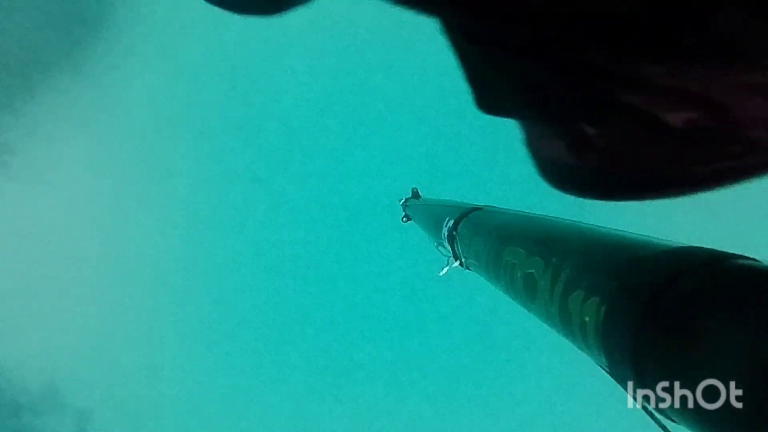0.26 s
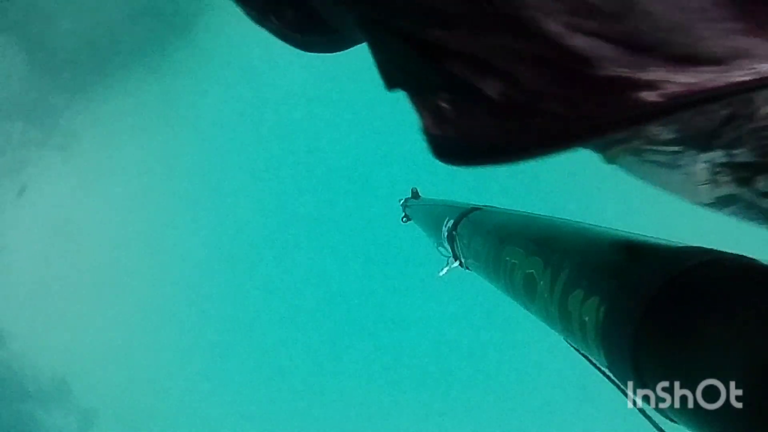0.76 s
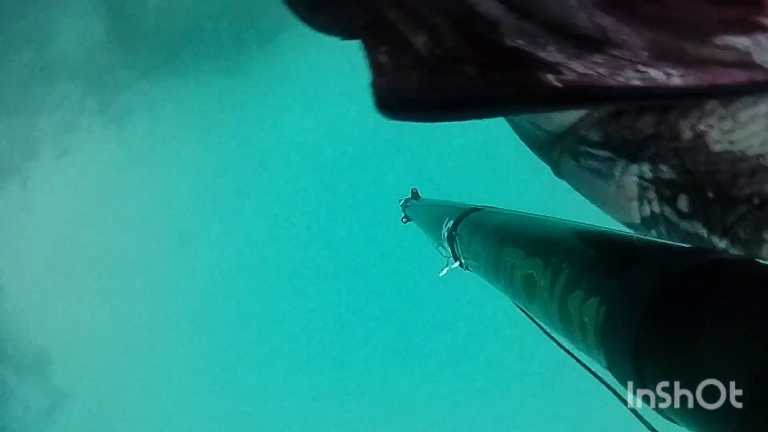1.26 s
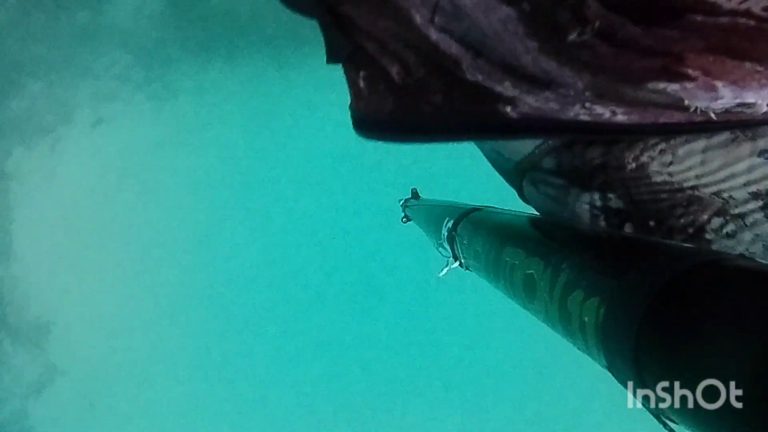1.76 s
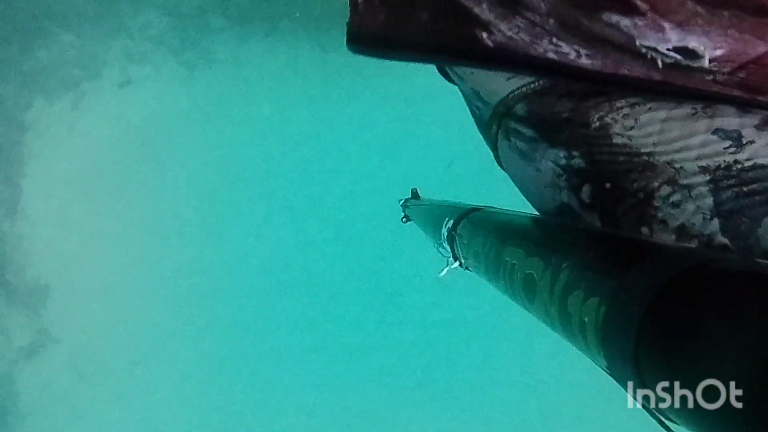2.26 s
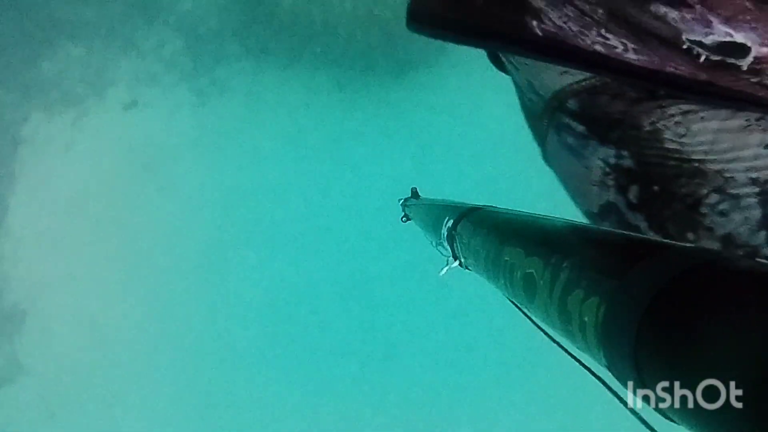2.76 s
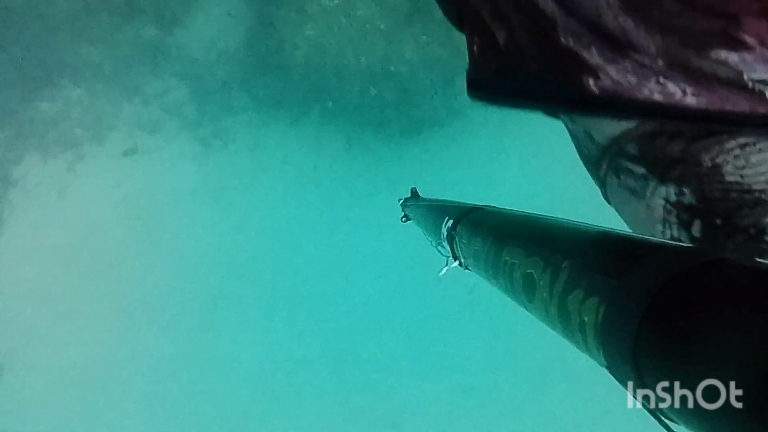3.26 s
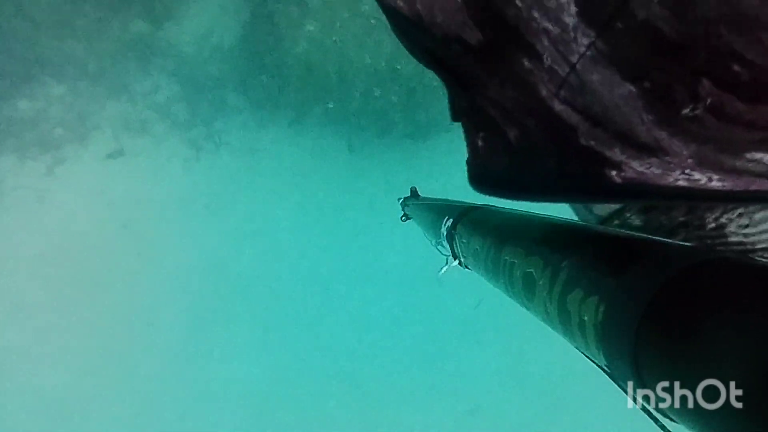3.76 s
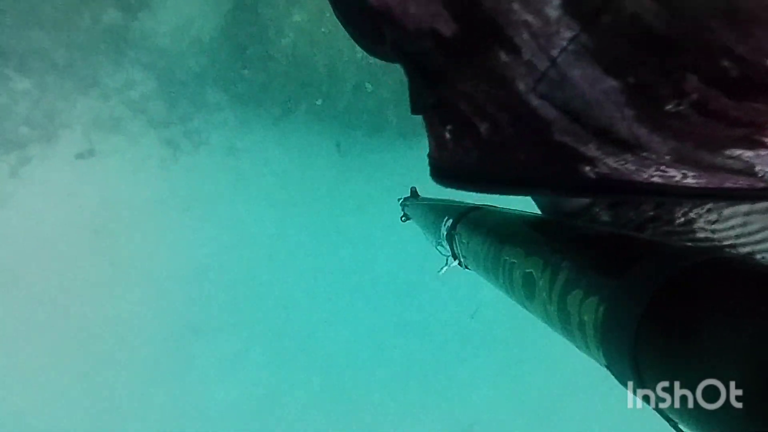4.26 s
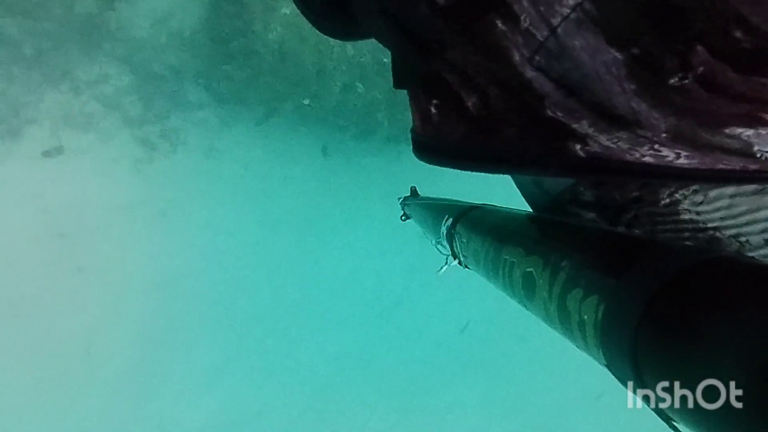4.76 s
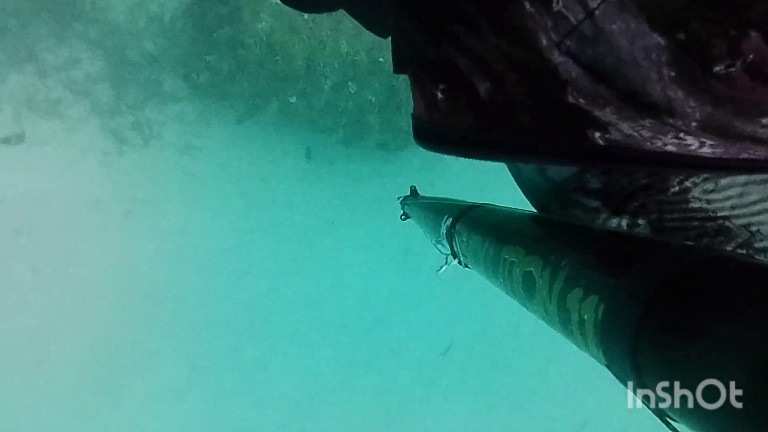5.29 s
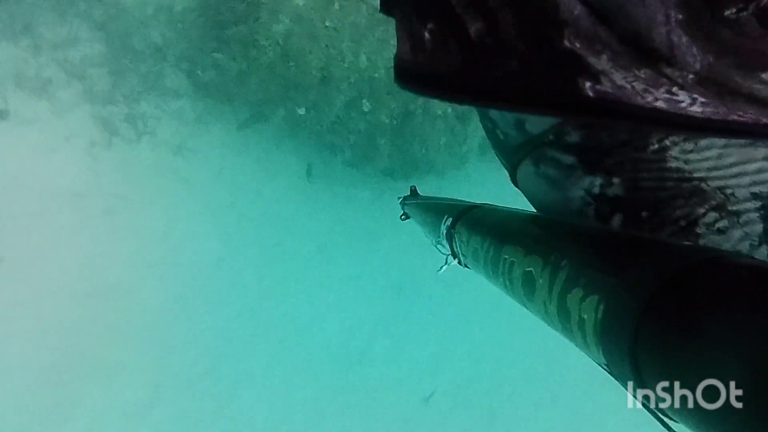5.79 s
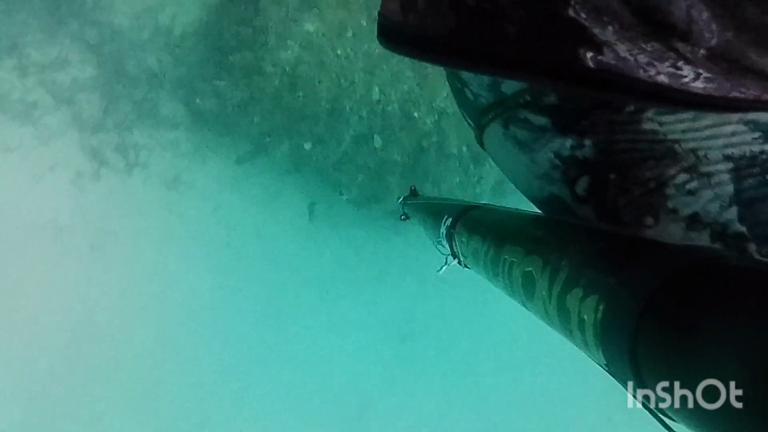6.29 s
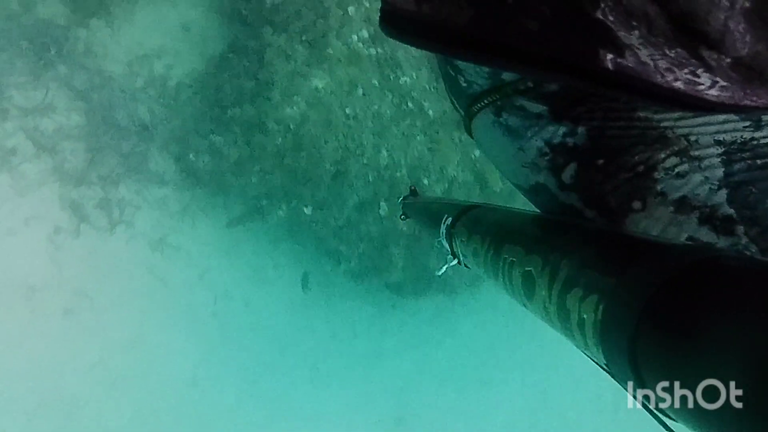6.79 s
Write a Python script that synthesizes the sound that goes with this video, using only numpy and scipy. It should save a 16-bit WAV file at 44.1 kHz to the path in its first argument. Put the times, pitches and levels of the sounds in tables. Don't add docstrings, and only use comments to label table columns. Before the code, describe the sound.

Loose gear knocks and ticks on a sealed underwater housing above low rumble and faint hiss, with violent blows near the start and end.

```python
import sys
import numpy as np
from scipy import signal
from scipy.fft import rfft, irfft
from scipy.io import wavfile
from scipy.ndimage import uniform_filter1d

SR = 44100
rng = np.random.default_rng(int(sys.argv[2]) if len(sys.argv) > 2 else 0)


def transcribe(signal):
    frames = np.atleast_2d(signal).T
    limited = np.clip(frames, -1, 1)
    pcm = np.round(limited * 32767).astype(np.int16)
    wavfile.write(sys.argv[1], SR, pcm)


def gain_from_db(level_db):
    decades = np.asarray(level_db, float) / 20
    return 10 ** decades


N = 310023

# (start_s, ring_db, crack_db, crack_tilt_db per octave, shove_db)
SLAMS = [
    (0.2803, -4.5, -52, -7.5, -42),
    (0.3014, 2, -24, -6, -14.5),
    (0.319, -69, -58, 8, -53),
    (6.9675, -5.5, -18, 3.5, -2.5),
]
# (pitch_hz, level_db, t60_s)
SNAP_RINGS = [
    [(2450, -5, .003), (3600, -7, .003), (4500, -3, 0.003), (5250, 2.5, 0.0045), (6200, -14, 0.004)],
    [(7313, -6.5, 0.0043), (8668, -1, 0.0022), (10500, -10, 0.00322), (14000, -12, .005)],
]


def evened(x):
    return x / np.sqrt(np.mean(x ** 2) + 1e-20)


def read(points, hz):
    f, value = np.transpose(points)
    return np.interp(np.log(hz + 1), np.log(f + 1), value)


def bumps(peaks, hz):
    return sum(db / (1 + (2 * (hz - f) / width) ** 2) for f, width, db in peaks)


def fade_db(ratio):
    return 10 * np.log10(1 + ratio ** 6)


def add(mix, s, sound):
    part = mix[round(s * SR):][:len(sound)]
    part += sound[:len(part)]


def ring(modes, spread, blow_s, size, turns=0, vary_db=3.5):
    t = np.arange(size) / SR
    hz, db, t60 = np.transpose(modes)[:, :, None]
    pitch_chance, level_chance = rng.standard_normal((2, len(modes), 1))
    rise = 1 - np.exp(-(t / (blow_s + turns / hz)) ** 2)
    decay = gain_from_db(db + vary_db * level_chance - 60 * t / t60)
    sines = np.sin(2 * np.pi * hz * (1 + spread * pitch_chance) * t)
    x = (decay * rise * sines).sum(0)
    return x / abs(x).max()


def struck(rows, groups, blow_s, size, turns, spread, vary_db):
    out = np.zeros(N)
    for s, db, *others_db in rows:
        for modes, rel_db in zip(groups, [0, *others_db]):
            add(out, s, gain_from_db(db + rel_db) * ring(modes, spread, blow_s, size, turns, vary_db))
    return out


def blows(rows, low_db, mid_db, up_db, thud_db):
    return [(s, db, low_db + deep, mid_db + hard[0], up_db + hard[-1], thud_db + deep)
            for s, db, deep, *hard in rows]


def noise(field_db, patchy_db, flicker_db, size, count=N, order=5):
    frames = 4 * count // size + 8
    hz = np.fft.rfftfreq(size, 1 / SR)[:, None]
    a, b, patches = rng.standard_normal((frames, len(hz), 3)).T
    patches = uniform_filter1d(patches, size=order, axis=0)
    patches = evened(uniform_filter1d(patches, size=5, axis=1))
    flicker = flicker_db * rng.standard_normal(frames)
    z = (a + 1j * b) * gain_from_db(field_db(hz) + patchy_db(hz) * patches + flicker)
    return evened(signal.istft(z, nperseg=size, noverlap=3 * size // 4)[1][:count])


def since_big_blows():
    t = np.arange(N) / SR
    return [t - SLAMS[1][0], t - SLAMS[3][0]]


def rumble_and_wash(flow_db):
    # (pitch_hz, level_db per Hz)
    colour = [(8, -14), (19, 0), (28, -9), (40, -11), (62, -8), (85, -22), (130, -17), (176, -15),
              (230, -22), (262, -30), (460, -27), (650, -32), (900, -43), (1300, -80)]
    rumble = noise(lambda hz: read(colour, hz) - fade_db(hz / 110), lambda hz: 1.5, .6, size=4096)
    wash = noise(lambda hz: read(colour, hz) - fade_db(110 / (hz + 1)), lambda hz: 1.8, 1.0, size=1024)
    surge_db, surge_t60 = -30, .3
    surge = sum(gain_from_db(surge_db - 60 * abs(u) / surge_t60) * (u > 0) for u in since_big_blows())
    drag = uniform_filter1d(1. * (np.arange(N) / SR < SLAMS[1][0]), size=3000)
    wash_db = -66.5 + 0.76 * flow_db + 11.5 * drag
    return (gain_from_db(-55 + flow_db) + surge) * rumble + gain_from_db(wash_db) * wash


def hiss(flow_db):
    # (pitch_hz, level_db per Hz)
    colour = [(410, -35), (700, -18.5), (1140, -7.5), (1450, 4), (1650, 1.5), (1910, -4), (2770, -12.5),
              (3200, -11.5), (4580, -15), (5150, -8), (9720, -17.5), (10500, -18), (11900, -27),
              (14500, -26), (16500, -38.5)]
    # (pitch_hz, width_hz, level_db)
    peaks = [(2715, 170, 12), (5070, 170, 6.5), (6830, 450, 6), (10800, 600, 3.5)]

    def field_db(hz):
        return read(colour, hz) + bumps(peaks, hz)

    low = noise(lambda hz: field_db(hz) - fade_db(hz / 3500), lambda hz: 1.2, .8, size=1024)
    top = noise(lambda hz: field_db(hz) - fade_db(3500 / (hz + 1)) - 25 * (hz > 15500),
                lambda hz: 6.5 * hz / 12000, .6, size=2048, order=2)
    duck_after_s, duck_hold_s = 0.032, 0.293
    duck = sum(1. * (u > duck_after_s) * (u < duck_after_s + duck_hold_s) for u in since_big_blows())
    duck = uniform_filter1d(duck, size=800)
    return gain_from_db(-70.5 + 0.068 * flow_db) * (low + gain_from_db(-5 - 5 * duck) * top)


def water():
    # (start_s, level_db)
    flow = [(0, -2.5), (.13, 9.5), (.25, 10), (.45, -4.5), (.62, 1.5), (1.02, -2), (1.23, 3), (1.62, 5),
            (1.8, -1), (2.21, 6), (2.5, 2.5), (2.99, -1), (3.21, 0), (4.31, 0), (5.66, -4.5), (6.32, 1),
            (6.6, -0.5), (7.03, -0.5)]
    flow_db = np.interp(np.arange(N) / SR, *np.transpose(flow))
    return rumble_and_wash(flow_db) + hiss(flow_db)


def scrape():
    # (pitch_hz, level_db per Hz)
    colour = [(59, -35), (100, -4.5), (298, -12), (367, -8.5), (426, -2.5), (670, 1), (1070, -8.5),
              (1620, -1.5), (1960, -5), (2650, -24.5), (2910, -26.5), (3650, -23.5), (4480, -19.5),
              (6790, -37.5), (9000, -55), (11700, -69), (19800, -120)]
    # (pitch_hz, width_hz, level_db)
    peaks = [(619.7, 150, 3), (1770, 240, 4), (3400, 200, 2.5), (4650, 800, 8), (2450, 500, 6.5),
             (3050, 200, -10), (3750, 250, -9), (7300, 300, 4.5)]
    # (start_s, level_db)
    strength = [(0, -42.5), (.04, -44.5), (.085, -45.5), (.095, -45.5), (.13, -49), (.17, -44), (.2, -49.5),
                (.215, -60), (.277, -56.5)]
    out, t = np.zeros(N), np.arange(0, strength[-1][0], 1 / SR)
    grit = noise(lambda hz: read(colour, hz) + bumps(peaks, hz), lambda hz: 3.5, 2.5,
                 size=512, count=len(t))
    add(out, 0, gain_from_db(np.interp(t, *np.transpose(strength))) * grit)
    return out


def thinned(x):
    # (pitch_hz, level_db)
    gap_below = [(2400, -14), (3400, -5.5), (5200, -6.5), (8000, -3.5), (11000, -2), (14000, -0.5)]
    hz, _, z = signal.stft(x, SR, nperseg=2048, noverlap=1536)

    def mean_power(z, size):
        over_pitch = uniform_filter1d(abs(z) ** 2, size, axis=0)
        return abs(uniform_filter1d(over_pitch, size=3, axis=1)) + 1e-24

    beside_db = 10 * np.log10(mean_power(z, size=3) / mean_power(z, size=41))
    under_db = read(gap_below, hz)[:, None] - beside_db
    is_treble = hz[:, None] > gap_below[0][0]
    kept = z * gain_from_db(-16 * np.clip(under_db / 2, 0, 1) * is_treble)
    kept = kept * np.sqrt(mean_power(z, size=41) / mean_power(kept, size=41))
    return signal.istft(kept, SR, nperseg=2048, noverlap=1536)[1][:N]


def crackle():
    snaps_per_s, level_db = 40, -72.5
    happens = rng.random(N) < snaps_per_s / SR
    sizes = gain_from_db(4.6 * np.minimum(rng.exponential(1, N), 2)) * happens
    middle = ring(SNAP_RINGS[0], 0.012, .0001, size=500)
    top = ring(SNAP_RINGS[1], .02, .0001, size=500)
    return gain_from_db(level_db) * signal.oaconvolve(sizes, middle + 0.34 * top)[:N]


def shrimp_snaps():
    # (start_s, level_db of the middle, top_db against it)
    snaps = [(.181, -43, -22), (1.2366, -56.5, 2), (1.3985, -63, -27), (1.8701, -48.5, -4),
             (1.918, -53, -1), (2.0622, -57, -6), (2.6647, -56.5, 3.5), (2.8154, -54, -13.5),
             (3.2428, -58, -1), (3.2826, -46, -5), (3.6454, -55, -15), (3.6992, -56, -20.5),
             (4.062, -60, -11), (4.2153, -60.5, 5), (4.3914, -55.5, 2), (4.4116, -55, -19),
             (4.5114, -47, 0), (4.6339, -57, -16), (4.7721, -55, -24), (4.9866, -54.5, -25),
             (5.3175, -57, -22), (5.329, -58, -22), (5.415, -60, -22), (5.3544, -59, -15),
             (5.683, -58, -17), (5.7878, -58, -20), (5.881, -55, -2), (5.9803, -51, -24.5),
             (6.323, -46.5, -22), (6.356, -40.5, -18), (6.3667, -54, -21), (6.4364, -55, 2)]
    return struck(snaps, SNAP_RINGS, 0.00026, 500, turns=0, spread=.03, vary_db=3)


def thumps():
    # (start_s, level_db, pitch_hz, t60_s)
    bumps_in_water = [
        (6.533, -44, 135, .08),
        (6.536, -50, 190, .05),
        (.225, -36, 200, .05),
        (2.21, -48, 145, .08),
        (3.02, -44, 228, .09),
        (1.40, -48, 215, .09),
        (.305, -29, 20, 2.0),
        (6.970, -12, 12, .058),
    ]
    out = np.zeros(N)
    for s, db, hz, t60 in bumps_in_water:
        add(out, s, gain_from_db(db) * ring([(hz, 0, t60)], 0, 0.0022, size=round(t60 * SR)))
    return out


def slips():
    # (first_s, last_s, slip_rate_hz, low_ring_db, high_ring_db against the low)
    trains = [(0.5144, 0.605, 43, -55.5, -14.5), (1.019, 1.167, 35, -58, -8), (1.6778, 1.722, 42, -57, -10),
              (1.7574, 1.8345, 50, -53.5, -8), (1.9275, 1.9565, 35, -57, -9), (2.167, 2.231, 45, -54, -14),
              (5.994, 6.0217, 39, -59, -10), (6.07, 6.2178, 40, -59, -10), (6.254, 6.333, 41, -53.5, -15),
              (6.379, 6.503, 40, -55, -8), (6.5896, 6.701, 26, -58, -12), (6.8925, 6.9306, 51, -44, -9)]
    # (start_s, low_ring_db, high_ring_db against the low)
    catches = [(0.383, -51, -29), (.5636, -52.5, -6.5), (1.705, -49, -7), (1.816, -49, -17),
               (2.272, -59, -8.5), (2.3423, -57, -9), (2.745, -58.5, -35), (6.3555, -54, -30),
               (5.8, -55, -8), (6.0912, -53, -14), (6.119, -47, -9), (6.1942, -47.5, -8),
               (6.2799, -52.5, -8), (6.4324, -50.5, -7), (6.755, -50, -7.5), (6.785, -56.5, -7),
               (6.8733, -52, -9), (6.953, -54, -25)]
    jitter_s, spread_db = .001, 1.5
    rows = []
    for first, last, hz, db, high_db in trains:
        times = np.linspace(first, last, round((last - first) * hz) + 1)
        chance = rng.standard_normal((len(times), 2))
        for s, (late, loud) in zip(times, chance):
            rows.append((s + jitter_s * late, db + spread_db * loud, high_db))
    return rows + catches


def line_ticks():
    # (pitch_hz, level_db, t60_s)
    tones = [
        [(1632, 13, 0.023), (1700, -10.5, 0.0123), (2170, -5, 0.034)],
        [(4510, 0, 0.011), (4750, -3, 0.008), (5200, 0, 0.003)],
    ]
    return struck(slips(), tones, 0.0014, 1200, turns=0, spread=.008, vary_db=2)


def tube_raps():
    # (start_s, main_ring_db, depth_db, middle_hardness_db, upper_hardness_db)
    raps = [
        (0.352, -38.5, -5, -1, -3),
        (0.429, -38.5, 1.5, 0, 2.5),
        (0.683, -21.5, -1, -2.5, 5.5),
        (0.6945, -40, 0, 2, 6),
        (0.908, -49, 10, 17, 12),
        (1.729, -44, 1, 0, 3),
        (1.843, -54.5, 14, 13, 11),
        (2.71, -40.5, 1, -4, -13),
        (3.172, -44.5, 8, 6.5, -11),
    ]
    # (pitch_hz, level_db, t60_s)
    tube = [
        [(620, 9.5, 0.025), (650, -3.5, 0.041)],
        [(464, 3, 0.035), (394.4, -2, 0.049)],
        [(830, 1.5, 0.027), (858, -1, 0.014), (1084, 0, 0.018), (1218, 1, 0.03)],
        [(1504, 1, 0.0206), (1600, 5.5, 0.014), (1960, -6, 0.02), (2326, -18, 0.02), (2650, -24.5, .024),
         (3170, -30.5, 0.024)],
        [(227, -12.5, 0.088), (296, -9.5, 0.038)],
    ]
    rows = blows(raps, low_db=-4, mid_db=-3.5, up_db=-6.5, thud_db=-7.5)
    return struck(rows, tube, 0.00042, 3000, turns=.4, spread=.012, vary_db=2)


def housing_knocks():
    # (start_s, main_ring_db, depth_db, hardness_db, or middle and upper hardness_db apart)
    knocks = [(0.528, -54.5, -4, -4.5), (0.826, -58.5, 5.5, -5), (0.936, -53, 1, -12), (1.359, -53, 4, -3),
              (1.371, -66, 23, 10), (1.4015, -44, 2, -14, -9), (1.406, -32.5, 1, -14, -7),
              (1.567, -42, -3, -7), (1.69, -58, 6, 5), (1.715, -56, 15.5, 16), (1.749, -36, 3, 4, 4),
              (1.905, -56, 4, -6), (1.99, -32.5, -4, 0, 0), (2.081, -50, -11, -4), (2.092, -33, -1, 3, 5),
              (2.177, -50.5, 8, 4), (2.199, -34.5, 0, 5, 5), (2.34, -48.5, -9, -3.5),
              (2.372, -41.5, -1.5, -2, -4), (2.744, -56, 16, 5), (2.825, -46.5, 1, -1.5),
              (3.018, -25.5, -3, -6, 2.5), (3.095, -49.5, -6, -3), (3.309, -62, 4, -1),
              (3.578, -35, -4, 2, -4), (3.784, -38, -3, 2, 0), (3.789, -36, -4, -14),
              (4.701, -42, -2, -7, -19), (4.706, -39, -2, -24), (4.8015, -44, -6, -3, -17),
              (4.806, -41, -4, -22), (5.233, -34.5, -5, -1, -6), (5.556, -69, 15, 11.5),
              (5.759, -64.5, 15, 8)]
    more_knocks = [
        (.180, -34, 2.4, 4),
        (0.224, -35, 1, -9, 3),
        (0.249, -41, 4, -6, -1),
        (0.2694, -36, 5.2, 7),
        (.322, -43, 6, 12, 10),
        (3.747, -67.5, 8.6, 19),
        (5.028, -65, 15, 9, 16),
        (5.289, -63.5, 19, 11, 19),
        (5.412, -67, 15, 3, 14),
    ]
    # (pitch_hz, level_db, t60_s)
    shell = [
        [(615, 7, 0.026), (673, -5, 0.02)],
        [(467, 7, 0.062), (410, -10, 0.013)],
        [(1270, 0, 0.022), (1120, -14, 0.012), (2110, -9, 0.012), (3290, -18, 0.010)],
        [(800, 9.5, 0.02), (1630, 3, .02), (1518, -7, 0.038), (1930, -6.5, 0.022), (1050, -4, .012),
         (2300, -9, 0.012), (2640, -14, 0.01)],
        [(245.4, -3, 0.053), (137.73, -8, 0.067)],
    ]
    rows = blows(knocks + more_knocks, low_db=-7.5, mid_db=-8, up_db=-6, thud_db=-16)
    return struck(rows, shell, 0.00058, 3000, turns=.9, spread=.012, vary_db=2)


def slams():
    # (pitch_hz, level_db)
    crack_colour = [(1500, -10.5), (3000, -4), (5000, 8), (7500, -11.5), (11000, -8.5), (13000, -21),
                    (15500, -8), (16600, -16.5), (17000, -49)]
    # (pitch_hz, level_db, t60_s)
    blow_modes = [
        [(435, -4, .035), (612, 2, 0.025), (871, -12, .015), (1240, 0, .011), (1320, -22, .04),
         (1640, -5.5, 0.011), (2399.5, -12, 0.0094), (3220, -29, 0.0097), (5600, -38, 0.0077)],
        [(465, 1.5, .033), (585, 0.5, 0.034), (760, -3, 0.022), (1100, -16, .025), (1450, -15, .028),
         (1770, 1, 0.012), (1930, -3, 0.013), (2280, -20, 0.016), (3100, -34, .018), (3560, -28, 0.012),
         (4390, -10.5, .008), (4950, -12, .006), (5560, -28.5, 0.0089)],
        [(4402, 0, .01)],
        [(208, -20, 0.05), (405, -11.5, 0.026), (645, 2, 0.016), (790, -10.5, 0.024), (1330, -14.5, 0.021),
         (1560, -18, .015), (1760, -12, 0.016), (2140, -14, 0.012), (2916, -24, 0.0093), (2920, -52, .07),
         (3700, -36, .012), (4730, -20, 0.015), (5150, -8, .006), (6000, -7.5, 0.006), (12400, -20.5, 0.0061)],
    ]
    first_swing = [1, 1, 1, -1]
    crack_t60 = 0.00699
    out, t = np.zeros(N), np.arange(4096) / SR
    hz = np.fft.rfftfreq(len(t), 1 / SR)
    for (s, ring_db, crack_db, tilt_db, shove_db), modes, swing in zip(SLAMS, blow_modes, first_swing):
        body = ring(modes, 0, 0.00058, size=4096, turns=0.083, vary_db=-0.5)
        add(out, s, swing * gain_from_db(ring_db) * body)
        colour = gain_from_db(read(crack_colour, hz) + tilt_db * np.log2(hz / 4000 + 0.0092))
        crack = evened(irfft(rfft(rng.standard_normal(len(t))) * colour, len(t)))
        add(out, s, gain_from_db(crack_db - 60 * t / crack_t60) * crack * np.minimum(t / 0.00013, 1))
        shove_s = .0042 * gain_from_db(.2 * shove_db)
        push = np.sin(np.pi * np.minimum(t / shove_s, 1) ** 0.25)
        add(out, s, -gain_from_db(shove_db) * push)
    return out


def scene():
    background = thinned(scrape() + water()) + crackle() + shrimp_snaps()
    gear = thumps() + line_ticks() + tube_raps() + housing_knocks() + slams()
    return (background + gear)[None]


def top_cut(x):
    return signal.sosfilt(signal.butter(12, 16750, fs=SR, output="sos"), x)


def record(dry):
    x = np.clip(dry, -.98, .98)
    for cut_hz in (24, 9):
        x = signal.lfilter(*signal.butter(1, cut_hz, "high", fs=SR), x)
    low_pass = signal.firwin(255, 16600, window=("kaiser", 9), fs=SR)
    limited = signal.oaconvolve(x, low_pass[None], "same")
    return top_cut(limited)


dry = scene()
out = record(dry)
transcribe(out)
```